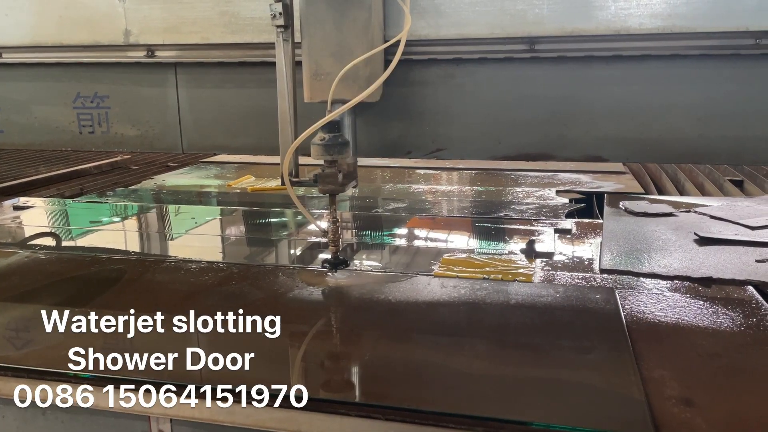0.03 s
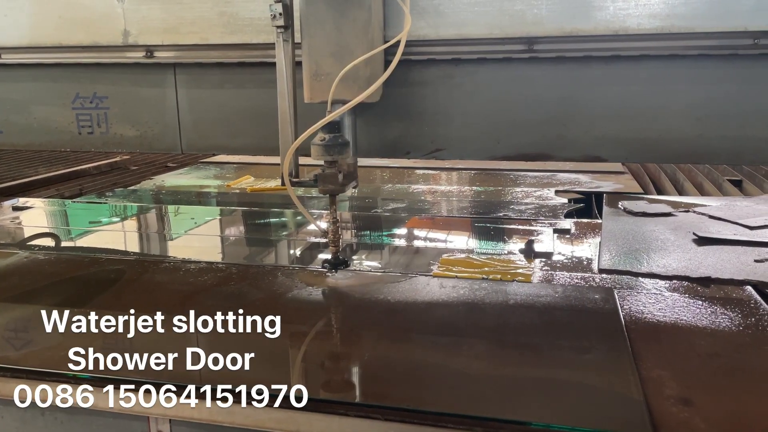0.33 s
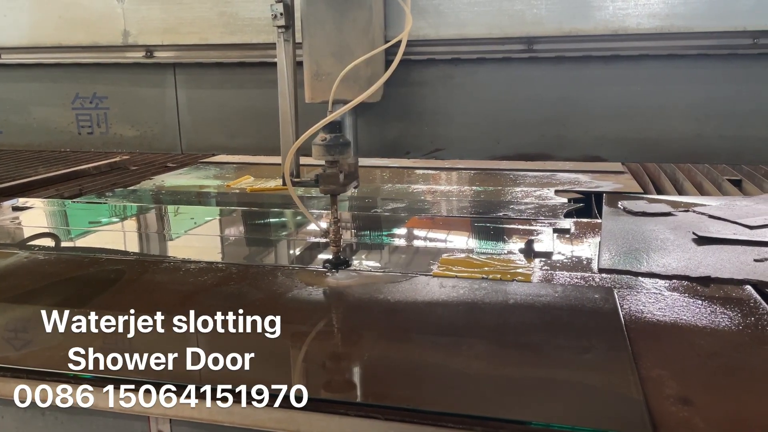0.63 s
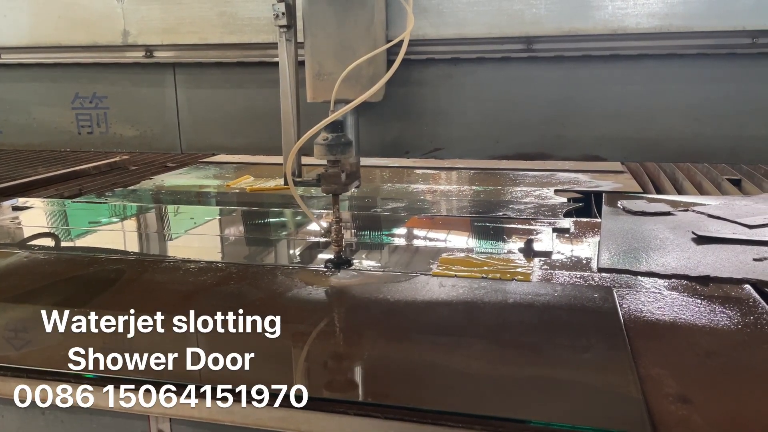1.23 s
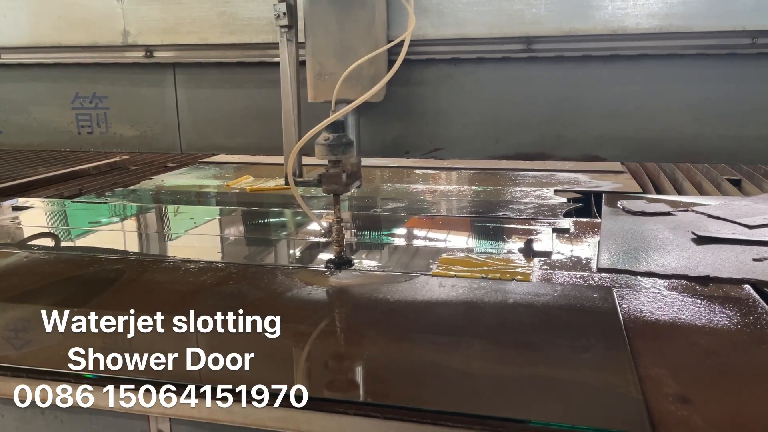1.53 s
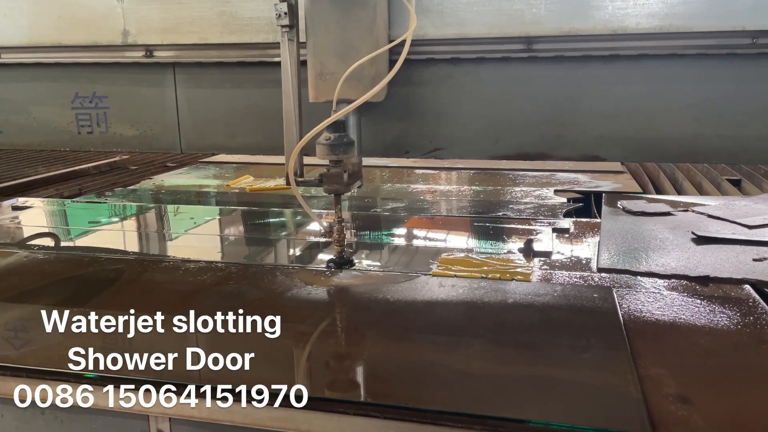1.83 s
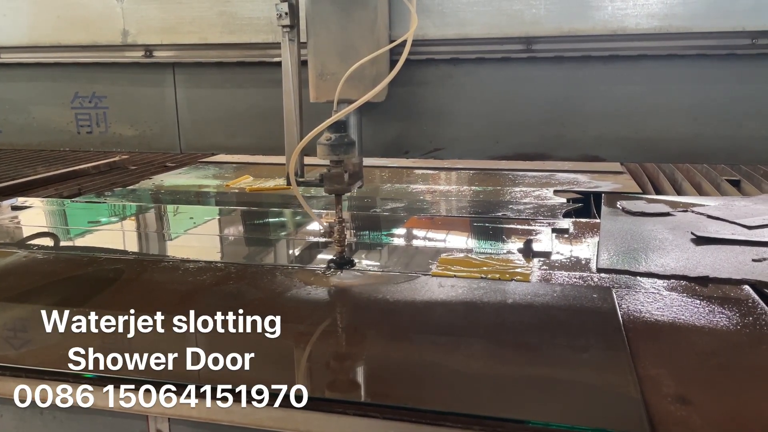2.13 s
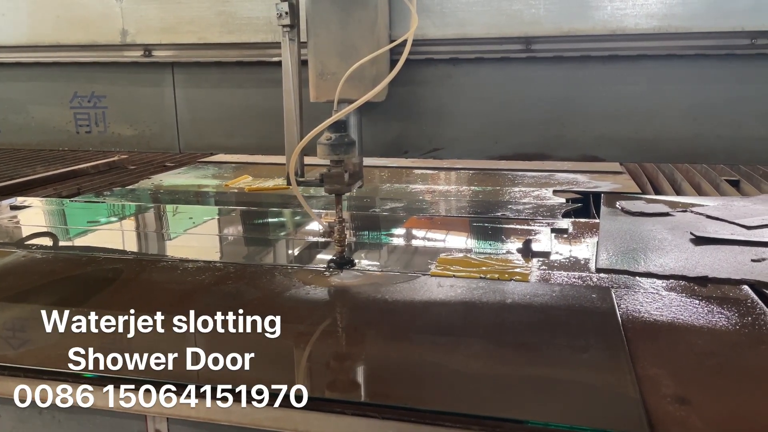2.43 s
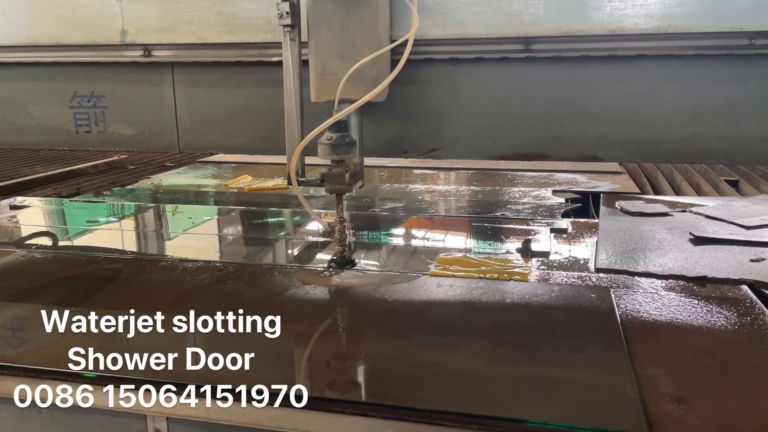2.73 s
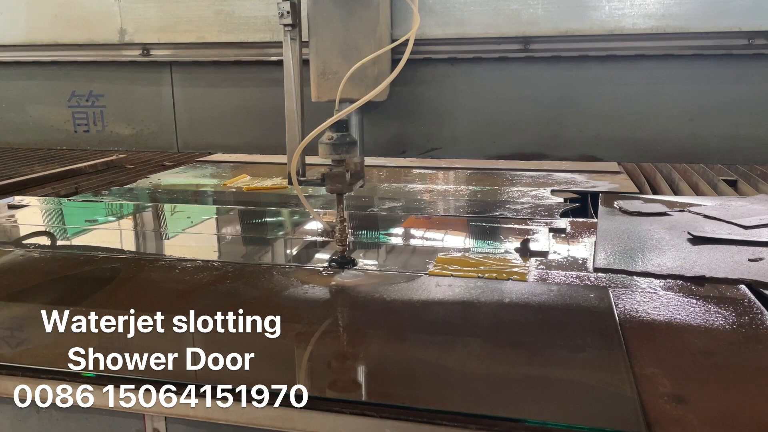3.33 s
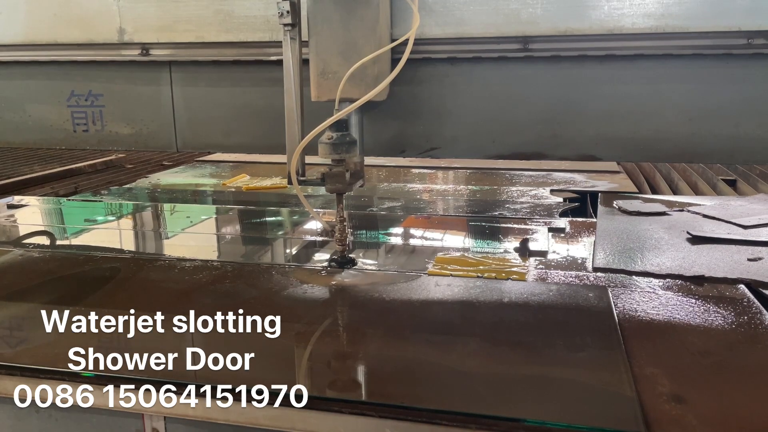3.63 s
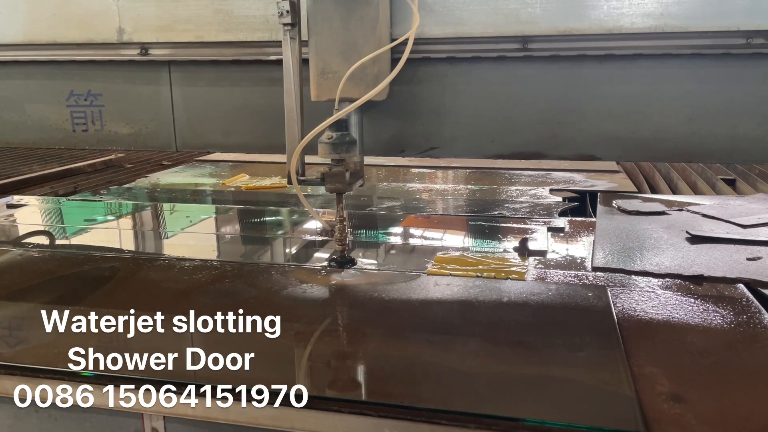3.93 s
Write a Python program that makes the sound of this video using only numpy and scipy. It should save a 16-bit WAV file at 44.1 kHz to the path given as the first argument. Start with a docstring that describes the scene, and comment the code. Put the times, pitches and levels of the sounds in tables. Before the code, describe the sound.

A waterjet hisses steadily through glass, over a faint machine whine and gurgling water.

```python
"""Waterjet cutting glass

An abrasive waterjet cuts a glass sheet on a machine table, close by in a workshop. The jet hisses in
the narrow cut, whose resonances swell and fade as the nozzle creeps on. The nozzle whistles hoarsely,
spray rushes over the sheet, the spent jet churns and gurgles in the water tank below, and the
machine hums and whines faintly."""
import sys
import numpy as np
from scipy import signal
from scipy.fft import rfft, irfft, next_fast_len
from scipy.io import wavfile
from scipy.ndimage import uniform_filter1d, map_coordinates

SR = 44100
rng = np.random.default_rng(int(sys.argv[2]) if len(sys.argv) > 2 else 0)


def transcribe(u):
    """Save the signal u as a 16-bit wav file named by the first command-line argument.

    u: samples, shape (n,) or (channels, n), limited to [-1, 1]; the rate is SR.
    q: integer samples, one column per channel.
    """
    v = np.clip(np.atleast_2d(u).T, -1, 1)
    q = np.round(v * 32767).astype(np.int16)
    wavfile.write(sys.argv[1], SR, q)


N = 176400


def amp(db):
    """Decibels to gain."""
    return 10 ** (np.asarray(db) / 20)


def along(points, hz):
    """Interpolate (f/Hz, value) points on a log frequency axis."""
    knots_hz, values = np.transpose(points)
    return np.interp(np.log(hz + 1), np.log(knots_hz + 1), values)


def curve(points):
    """Interpolate (t/s, value) points at every sample."""
    return np.interp(np.arange(N) / SR, *np.transpose(points))


def wobble(per_s):
    """Smooth random curve through per_s knots a second."""
    return map_coordinates(rng.standard_normal(2048), [np.arange(N) * per_s / SR], mode="wrap")


def swell(centre_s, length_s):
    """Gaussian bump of height 1."""
    return np.exp(-(2 * (np.arange(N) / SR - centre_s) / length_s) ** 2)


def filtered(x, response):
    """Apply a complex frequency response."""
    size = next_fast_len(N + 8192)
    return irfft(rfft(x, size) * response(np.fft.rfftfreq(size, 1 / SR)), size)[..., :N]


def stereo_gains(balance_db, lead_rad):
    """Complex left and right gains at constant total power."""
    half = np.array([[.5], [-.5]])
    gain = amp(half * balance_db)
    return gain / np.sqrt(np.mean(gain ** 2, axis=0)) * np.exp(1j * half * lead_rad)


ECHO_DB, ECHO_SPAN_S = -13.5, .035


def echoes(x, count):
    """Weak early reflections off the steel gantry and table ripple the spectrum above the bass."""
    delays_s = rng.uniform(.15, 1, count) * ECHO_SPAN_S
    signs = rng.choice([-1, 1], count)
    copies = sum(sign * np.roll(x, int(s * SR), axis=1) for s, sign in zip(delays_s, signs))
    return x + amp(ECHO_DB) / np.sqrt(count) * filtered(copies, lambda hz: hz / (hz + 300))


# f/Hz, width/Hz, lift/dB
SHEET_RESONANCES = [(139, 16, 1.5), (194, 4.3, 1), (374, 19, 0.5), (524, 48, 2.5), (1368, 32, 3),
                    (1900, 70, 3), (3890, 48, 3.5), (4440, 70, -3.5), (5310, 78, 9), (6460, 160, 3),
                    (9320, 160, 3.5), (10150, 87, 1.5)]


def resonance_db(hz):
    """Narrow resonances of the sheet and table colour every rush."""
    return sum(db / (1 + (2 * (hz - centre_hz) / width_hz) ** 2)
               for centre_hz, width_hz, db in SHEET_RESONANCES)


STEREO_COHERENCE = [(40, 0.99), (200, 0.89), (480, 0.66), (700, 0.19), (950, 0.59), (1400, 0.13),
                    (2150, 0.36), (2400, 0.81), (3500, 0.38), (3950, 0.76), (5100, 0.49), (5600, .93),
                    (6800, .8), (7500, .93), (7950, 1), (8650, 1), (9100, .82), (10400, .76), (11200, .98),
                    (12200, .98), (12700, .76), (14000, .82), (14600, 1), (15200, 1), (15800, .9)]  # f/Hz, coherence/0-1
STEREO_BALANCE = [(60, 0.2), (300, 0.7), (750, 3.1), (1100, 2.5), (1800, 0.3), (2450, -0.4), (2900, 4.3),
                  (4000, 1.9), (5000, 7.4), (5550, 0.1), (6500, 2.6), (7900, 0)]  # f/Hz, left minus right/dB
STEREO_LEAD = [(60, 0), (700, .4), (1200, 1), (1700, -.5), (2400, .1), (2800, 1.3), (3350, 1.7),
               (3650, -.4), (4900, .4), (5700, -.1), (6500, -.55), (7500, -2.3), (7950, -3.1), (8650, -3.2),
               (9100, -3.9), (10000, -4.9), (11100, -6.2), (12200, -6.4), (12700, -7.4), (14000, -8.5),
               (14600, -9.35), (15200, -9.5), (15800, -9.8)]  # f/Hz, left lead/rad


def rush(spectrum, patchy_db):
    """Turbulent stereo noise, its gain patchy in time and frequency."""
    def mid_side_gains(hz):
        angle = np.arccos(np.clip(along(STEREO_COHERENCE, hz), 0, 1)) / 2
        return amp(along(spectrum, hz) + resonance_db(hz)) * np.array([np.cos(angle), np.sin(angle)])

    bins = signal.stft(rng.standard_normal((2, N)), nperseg=1024)[2]
    patches = uniform_filter1d(rng.standard_normal(bins.shape[1:]), size=5, axis=0)
    patches = uniform_filter1d(patches, size=8, axis=1)
    noise = signal.istft(bins * amp(patchy_db * patches / patches.std()), nperseg=1024)[1][:, :N]
    noise = echoes(noise, count=14)
    noise = noise / noise.std() * np.sqrt(SR / 2)  # unit power per Hz
    mid, side = filtered(noise, mid_side_gains)
    pair = np.array([mid + side, mid - side])
    return filtered(pair, lambda hz: stereo_gains(along(STEREO_BALANCE, hz), along(STEREO_LEAD, hz)))


JET_SPECTRUM = [(3500, -125), (5100, -91), (5450, -81), (6100, -70.9), (6700, -71.9), (7000, -69),
                (7450, -66.6), (7800, -66.4), (8100, -69.8), (8450, -75.8), (9100, -74.9), (9400, -72.2),
                (9600, -75), (9900, -72.6), (10500, -78.3), (10850, -76.6), (11200, -82.6), (11600, -84.2),
                (11900, -86.2), (12950, -76.3), (14000, -74.3), (15500, -68.7), (16500, -72)]  # f/Hz, level/dB
BAND_CENTRES_HZ = [6600, 7400, 9850, 11500, 13300, 15000]  # resonant bands of the cut: f/Hz
# Gain of each band, low to high: t/s, level/dB
BAND_1_GAIN = [(0.0, 0.9), (0.1, 2.8), (0.15, 0.2), (0.3, 1.7), (0.7, -1.8), (0.75, 1.0), (1.0, -0.5),
               (1.2, 0.8), (1.6, -1.1), (2.1, 0.8), (2.4, -1.9), (2.75, 1.5), (2.8, -0.5), (2.9, 0.7),
               (3.15, -1.3), (3.65, 1.6), (3.7, 3.6), (3.99, 0.9)]
BAND_2_GAIN = [(0, 1), (.5, .4), (.8, 1.7), (1.55, 1.4), (1.8, 1.6), (2.3, -1.2), (2.9, -1.1), (3.1, -3),
               (3.35, -2.4), (3.45, .6), (3.62, -.8), (3.75, 3.6), (3.81, -.6), (4, -1.2)]
BAND_3_GAIN = [(0, 2.7), (.6, 1.2), (.9, 1.4), (1.7, -.9), (2.1, -1), (3.05, -1.1), (3.25, -2.6), (3.5, .4),
               (4, -.3)]
BAND_4_GAIN = [(0, .9), (.6, -.6), (1.1, 1.5), (1.35, -.4), (2.05, 1.1), (2.25, -.6), (2.75, 1.6),
               (3.25, 0), (3.7, 2.8), (4, .6)]
BAND_5_GAIN = [(0, -.8), (.5, -.9), (1.4, 2.4), (2.1, 1.6), (2.25, 0), (2.85, .3), (3.2, -1), (3.45, 1.4),
               (4, 1.6)]
BAND_6_GAIN = [(0, 1.5), (.25, 2.5), (.4, 1.7), (1.85, -.3), (2.15, 1.6), (2.4, -.9), (2.7, -1.6), (4, 1.9)]
NOTE_GAIN = [(0, 3.5), (1.6, 3.5), (2.2, -1), (4, -2)]  # singing note in the cut: t/s, level/dB
NOTE_HZ, NOTE_WIDTH_HZ = 9920, 260
JET_GAIN_DB, JET_FLUTTER_DB, BAND_SWAY_DB = -1.5, .5, .5


def jet():
    """The jet hisses and flutters in the cut; bands swell separately and a thin note dies away."""
    hiss = rush(JET_SPECTRUM, patchy_db=2.1)
    note = filtered(hiss, lambda hz: 1 / (1 + (2 * (hz - NOTE_HZ) / NOTE_WIDTH_HZ) ** 2))
    hiss = hiss + note * (amp(curve(NOTE_GAIN)) - 1)
    band_gains = (BAND_1_GAIN, BAND_2_GAIN, BAND_3_GAIN, BAND_4_GAIN, BAND_5_GAIN, BAND_6_GAIN)
    out = np.zeros((2, N))
    for share, gain in zip(np.eye(len(BAND_CENTRES_HZ)), band_gains):
        band = filtered(hiss, lambda hz: np.interp(hz, BAND_CENTRES_HZ, share))
        out += band * amp(curve(gain) + BAND_SWAY_DB * wobble(per_s=35))
    return out * amp(JET_GAIN_DB + JET_FLUTTER_DB * wobble(per_s=45))


WHISTLE_SPECTRUM = [(2150, -115), (2340, -77.5), (2440, -74), (2600, -76.5), (2800, -115)]  # f/Hz, level/dB
WHISTLE_FLARES = [(1.86, .09, 6), (3.76, .09, 6.5)]  # t/s, length/s, lift/dB
WHISTLE_ROUGH_DB = 1.6


def whistle():
    """A hoarse, flickering whistle at the nozzle flares twice."""
    flare_db = sum(db * swell(s, length_s) for s, length_s, db in WHISTLE_FLARES)
    return rush(WHISTLE_SPECTRUM, patchy_db=1.5) * amp(flare_db + WHISTLE_ROUGH_DB * wobble(per_s=35))


SPRAY_SPECTRUM = [(500, -115), (1000, -81), (1300, -79.5), (1700, -78.5), (2250, -76.5), (2450, -80.5),
                  (2750, -78.5), (2900, -73.5), (3080, -77), (3270, -73.5), (3500, -79), (3700, -76.5),
                  (4350, -76), (5000, -75.5), (5450, -87.5), (6000, -75), (9000, -120)]  # f/Hz, level/dB
SPRAY_FLUTTER_DB = .4


def spray():
    """Fine spray rushes evenly over the sheet and table."""
    return rush(SPRAY_SPECTRUM, patchy_db=1.48) * amp(SPRAY_FLUTTER_DB * wobble(per_s=30))


TANK_SPECTRUM = [(20, -94.3), (36, -83), (44, -75.5), (52, -65), (68, -62.2), (86, -65), (115, -62),
                 (230, -63.5), (265, -66), (400, -65.5), (530, -71), (650, -72), (950, -72), (1300, -80.5),
                 (2200, -105), (4000, -130)]  # f/Hz, level/dB
RUMBLE_HEAVES = [(.45, .07, 3.8), (.84, .08, -2.5), (1.4, .16, 1.6), (2.51, .08, 2.6), (3.06, .08, -3.5),
                 (3.31, .07, -3.3), (3.52, .09, -3), (3.61, .06, 3)]  # t/s, length/s, lift/dB
RUMBLE_CORNERS_HZ = [60, 100, 270, 360]  # band-pass corners: f/Hz


def tank():
    """The spent jet churns the water under the table; its deep rumble heaves and slackens."""
    churn = rush(TANK_SPECTRUM, patchy_db=1.15)
    heave_db = sum(db * swell(s, length_s) for s, length_s, db in RUMBLE_HEAVES)
    rumble = filtered(churn, lambda hz: np.interp(hz, RUMBLE_CORNERS_HZ, [0, 1, 1, 0]))
    return churn + rumble * (amp(heave_db) - 1)


MACHINE_TONES = [(49.5, -57, 0), (936.5, -53.7, 1.8), (790, -57.5, 2.2), (1547, -63.5, -1.8),
                 (2053, -63, -2.3)]  # f/Hz, level/dB, left lead/rad
TONE_DRIFT_RATIO, TONE_WAVER_DB = .0012, 2.3


def machine():
    """The machine hums and whines in thin, slightly unsteady tones."""
    out = np.zeros((2, N))
    for hz, db, lead_rad in MACHINE_TONES:
        phase = 2 * np.pi * np.cumsum(hz * (1 + TONE_DRIFT_RATIO * wobble(per_s=12))) / SR
        tone = np.sqrt(2) * amp(db + TONE_WAVER_DB * wobble(per_s=7.09)) * np.exp(1j * phase)
        out += np.real(tone * stereo_gains(along(STEREO_BALANCE, hz), lead_rad))
    return out


AIR_POCKETS = [(1.65, .12, 640, 150, -52), (1.87, .15, 510, 0, -42.5), (2.76, .1, 918, 0, -47),
               (3.07, .13, 540, 0, -48), (3.62, .12, 545, -150, -49), (3.74, .09, 735, 0, -51),
               (3.8, .15, 550, 600, -47)]  # t/s, length/s, f/Hz, glide/(Hz/s), level/dB
GURGLE_JITTER_HZ, GURGLE_ROUGH_DB = 12, 2.2


def gurgles():
    """Air pockets in the tank ring briefly, each at its own unsteady pitch."""
    out, t = np.zeros((2, N)), np.arange(N) / SR
    for s, length_s, hz, glide_hz_per_s, db in AIR_POCKETS:
        pitch_hz = hz + glide_hz_per_s * (t - s) + GURGLE_JITTER_HZ * wobble(per_s=60)
        envelope = np.sqrt(2) * swell(s, length_s) * amp(db + GURGLE_ROUGH_DB * wobble(per_s=60))
        tone = envelope * np.exp(2j * np.pi * np.cumsum(pitch_hz) / SR)
        out += np.real(tone * stereo_gains(along(STEREO_BALANCE, hz), along(STEREO_LEAD, hz)))
    return out


def scene():
    """Five continuous layers plus the gurgles, in stereo."""
    return jet() + whistle() + spray() + tank() + machine() + gurgles()


CUTOFF_HZ = 15800


def record(dry):
    """Brick-wall low-pass."""
    return filtered(dry, lambda hz: hz < CUTOFF_HZ)


dry = scene()
out = record(dry)
transcribe(out)
```